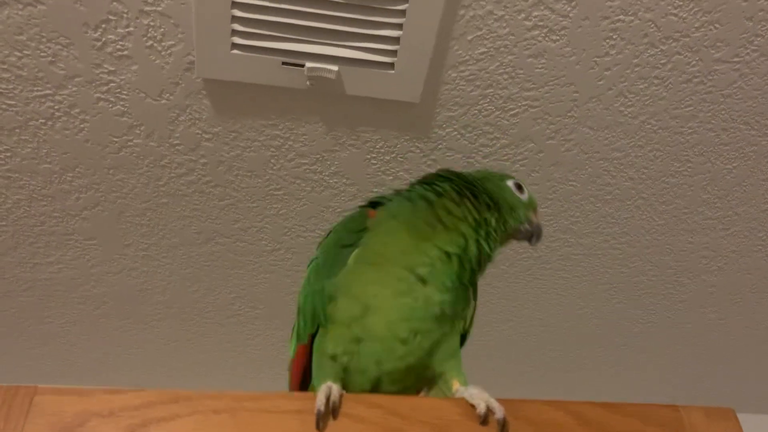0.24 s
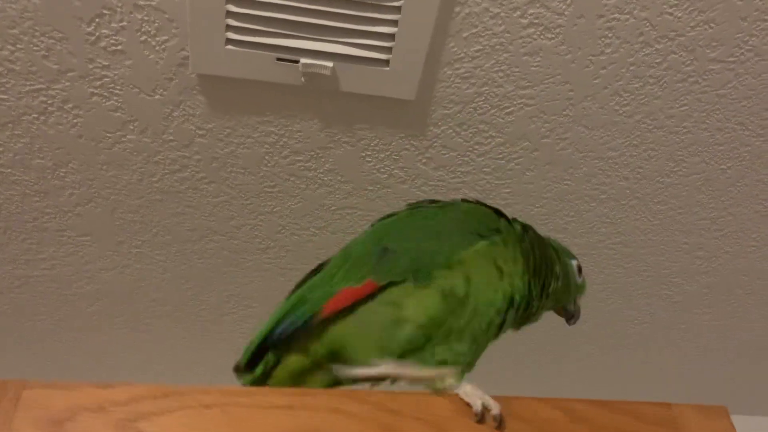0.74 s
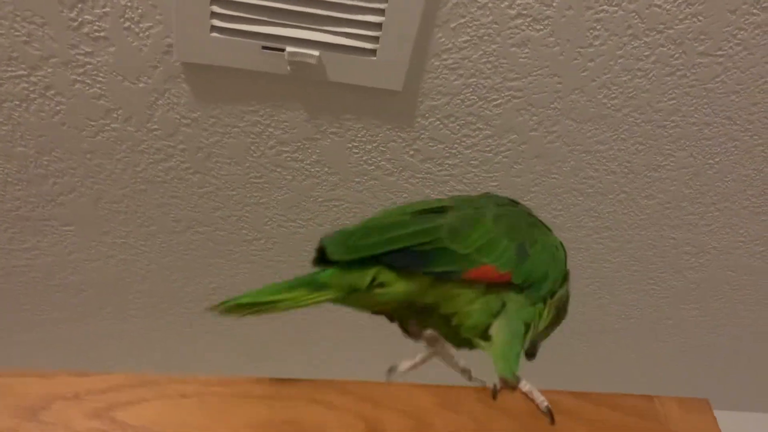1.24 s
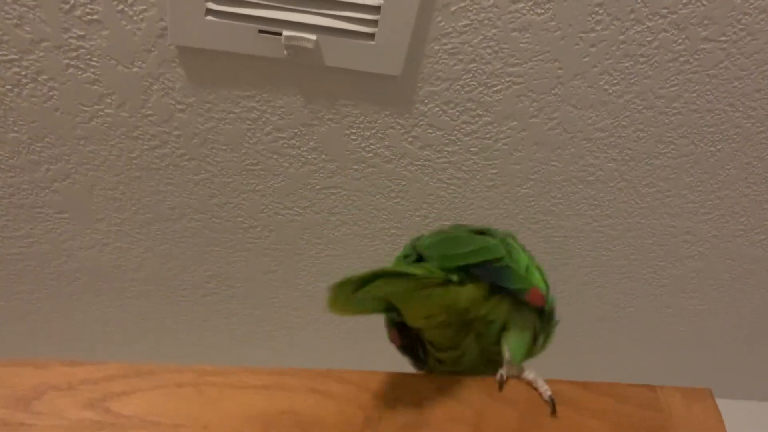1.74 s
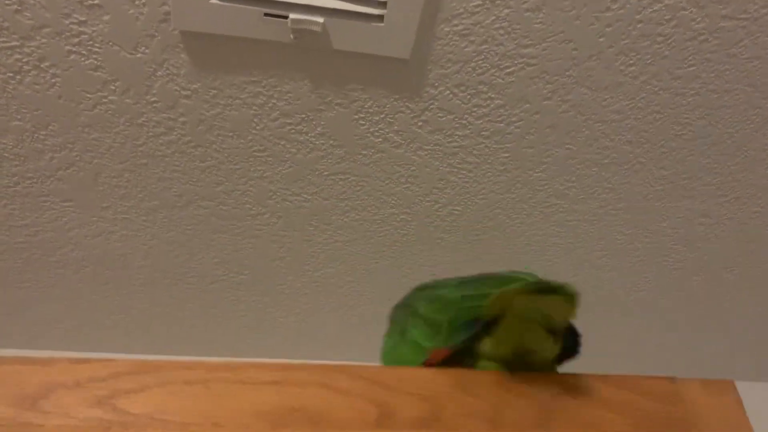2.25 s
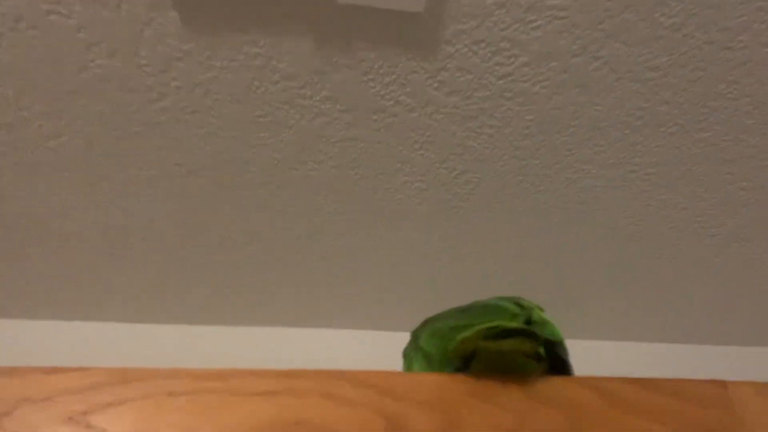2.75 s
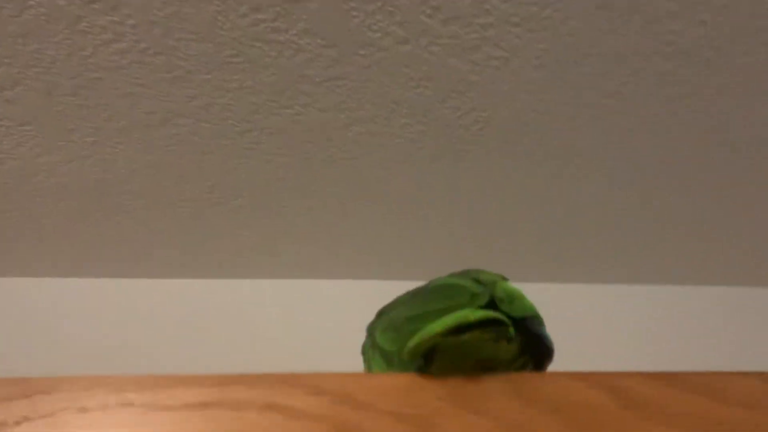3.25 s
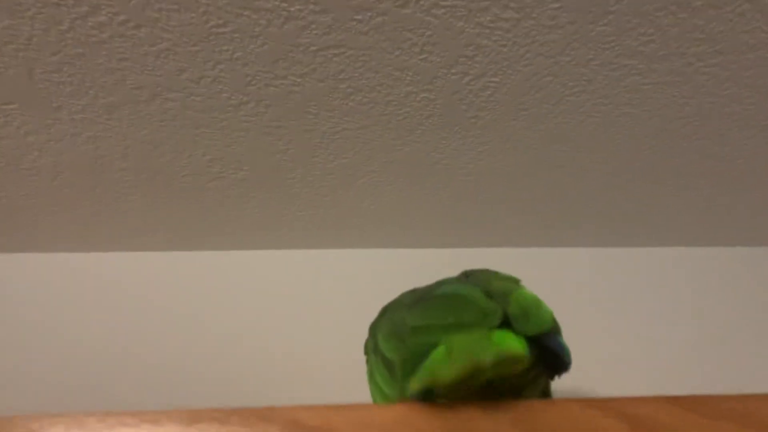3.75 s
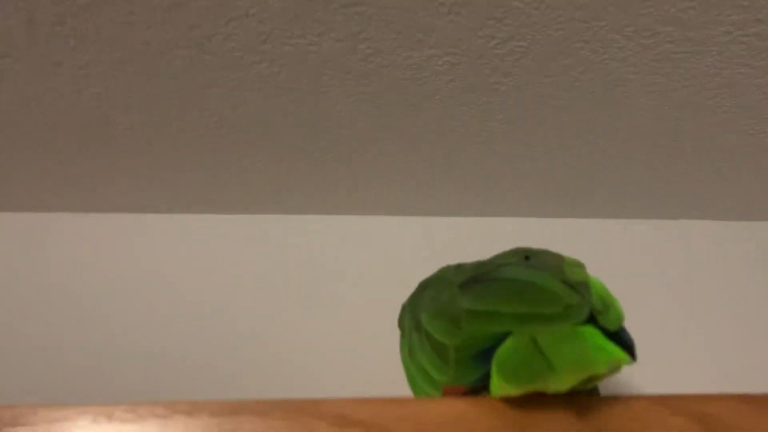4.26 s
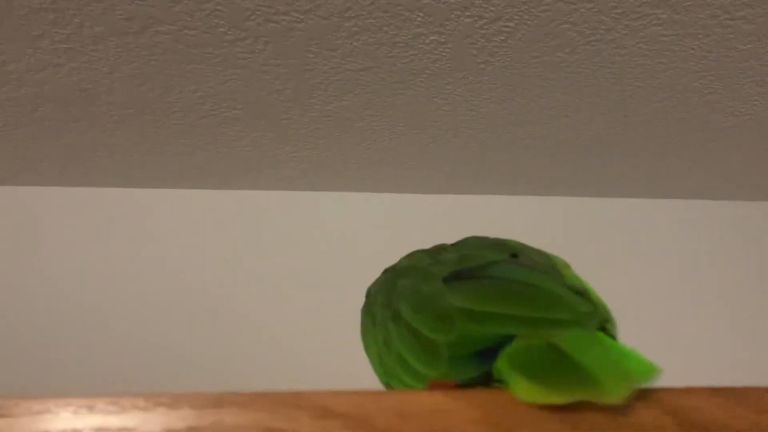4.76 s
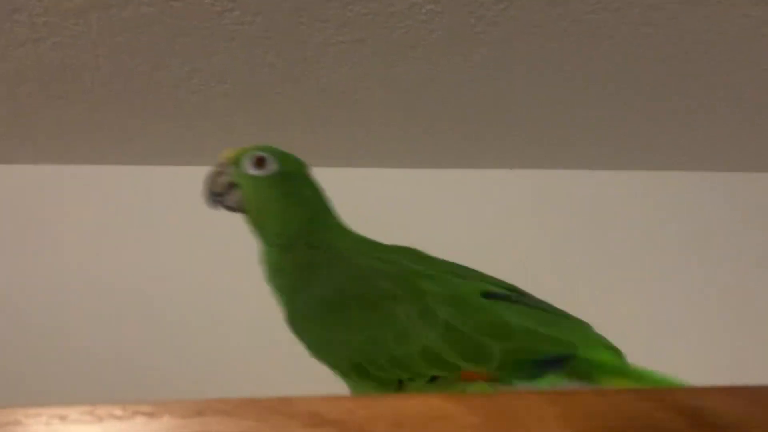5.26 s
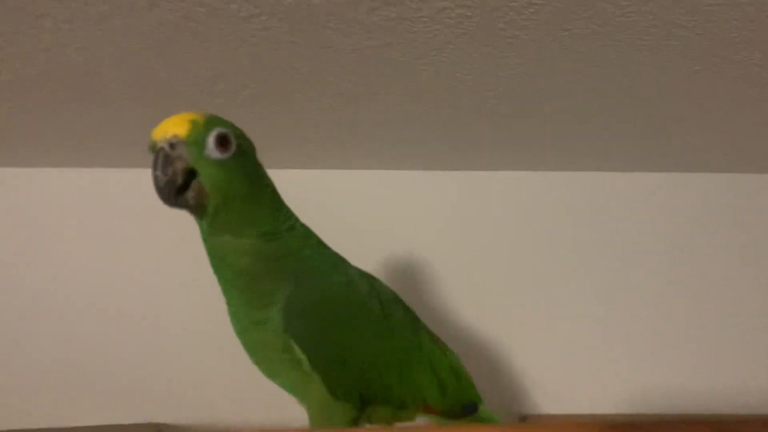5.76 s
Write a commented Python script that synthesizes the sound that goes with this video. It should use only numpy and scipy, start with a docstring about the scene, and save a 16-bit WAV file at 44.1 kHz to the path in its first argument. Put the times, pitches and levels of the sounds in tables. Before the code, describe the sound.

Over a steady low hum, a parrot shuffles on wood with light claw clicks, a dull thud and, finally, louder rustling.

```python
"""A steady mains hum fills a small room, where a parrot turns round on top of a wooden cabinet.
It bumps the hollow cabinet, whose modes answer with a low thud. Its claws tick, rasp and slide
on the ledge: stick-slip friction excites the wood's resonances, some with a tiny pitched ring.
Feathers brush the wood, with soft, dull shuffling. Near the end a close rustle sets in, with low
surges and the rumble of a hand conducted through the microphone's housing."""
import sys
import numpy as np
from scipy import signal
from scipy.fft import rfft, irfft, next_fast_len
from scipy.io import wavfile
from scipy.ndimage import uniform_filter1d

SR = 44100
rng = np.random.default_rng(int(sys.argv[2]) if len(sys.argv) > 2 else 0)


def output_pcm(signal):
    """Save a mono or channel-first signal as 16-bit PCM at the path in sys.argv[1].

    Samples are clipped to [-1, 1] before scaling.
    """
    pcm = np.clip(np.atleast_2d(signal).T, -1, 1) * 32767
    wavfile.write(sys.argv[1], SR, np.round(pcm).astype(np.int16))


N = 265658

# Levels are relative within each table; a spectrum gives the shape of a noise, per unit bandwidth.
MAINS_HZ = 59.98
# partials of the mains hum: harmonic_number, level_db
HUM_HARMONICS = [(1, -52.8), (2, -60.3), (3, -68.2), (5, -80.5), (6, -78.5), (10, -91)]
# slow swell of the hum: time_s, gain_db
HUM_GAIN = [(0, -1.5), (2.1, 1), (2.6, -1), (3.2, -0.2), (4.15, -1.5), (6.02, 1.5)]
# spectrum of the room's air: frequency_hz, level_db
AIR_SPECTRUM = [(12, -31), (25, -20), (38, 1), (60, 8), (100, 5.5), (200, -5.5), (370, -11.5), (600, -22),
                (1100, -26), (2500, -38.5), (5000, -41), (8000, -44), (12000, -44), (16000, -52)]
# bumps on the cabinet: start_s, thud_db, rap_db
CABINET_BUMPS = [(0.0585, -81, -72.5), (0.91, -65.5, -76), (1.041, -61, -99), (1.191, -64.5, -70),
                 (2.938, -54.5, -68), (3.266, -70, -79), (3.733, -46.5, -55), (3.774, -58, -70),
                 (4.054, -90.5, -75), (5.549, -56, -57.5), (5.926, -60.5, -71)]
# resonances of the door panel: frequency_hz, width_hz, gain_db
PANEL_MODES = [(465, 340, 2.5), (880, 240, 6.5), (1060, 270, 5), (1220, 145, 6), (1680, 140, -2),
               (2320, 270, -2.5), (3970, 740, -17)]
# modes of the hollow cabinet: frequency_hz, level_db, t60_s
CABINET_MODES = [(88.9, 7.5, 0.27), (135.5, 7.5, 0.23), (230.6, -0.5, 0.12), (279, -10.5, 0.12),
                 (316, -15.5, 0.16), (417.5, -11.5, 0.17), (617, -25.5, 0.35)]
# pitched ticks of beak or claw: centre_s, pitch_hz, level_db
PITCHED_TICKS = [(.062, 5700, -75.5), (0.318, 2396, -60.5), (.412, 1520, -74.5), (0.521, 3520, -75),
                 (0.593, 2380, -79), (.708, 2280, -72), (.988, 3710, -64), (1.005, 1180, -66),
                 (1.275, 2330, -74), (1.345, 2760, -73), (1.434, 2180, -81), (1.515, 2780, -63.5),
                 (2.234, 3300, -56), (2.791, 1790, -73), (2.955, 3210, -72), (3.307, 2740, -70.5),
                 (3.535, 2690, -70), (3.795, 2460, -65.5), (3.972, 2370, -73.5), (4.511, 2560, -71),
                 (4.687, 1880, -52.5), (4.697, 1104, -56), (5.162, 1950, -59), (5.372, 2530, -53),
                 (5.646, 2550, -55.5), (5.829, 2780, -59)]
# chatter of a dragged claw: start_s, length_s, pitch_hz, width_hz, level_db
CLAW_RASPS = [(0.585, 0.043, 3600, 200, -76.5), (0.713, 0.28, 2580, 550, -76),
              (0.734, 0.32, 3570, 330, -74.5), (1.04, 0.1, 3600, 90, -76), (1.145, 0.11, 620, 60, -63),
              (1.192, 0.093, 3710, 90, -66.5), (1.495, 0.16, 2770, 140, -67.5),
              (1.505, 0.065, 4750, 200, -72), (4.683, 0.06, 1980, 150, -65), (4.695, 0.074, 5660, 90, -60),
              (4.983, 0.034, 2000, 300, -58), (5.574, 0.045, 6250, 350, -50.5),
              (5.698, 0.041, 1270, 250, -58.5)]
# strokes of feathers on wood: start_s, length_s, level_db
FEATHER_STROKES = [(.6, 0.78, -79.5), (1.14, 0.15, -89), (1.85, 0.12, -79)]
# spectrum of feather friction: frequency_hz, level_db
FEATHER_SPECTRUM = [(300, -5), (1500, -2), (2600, 3), (3100, -3.5), (3700, 1), (7000, -5), (10000, 1.5),
                    (15500, -2)]
# dull scuffs, soft shuffling early, then low surges of the close rustle: start_s, length_s, level_db
DULL_SCUFFS = [(.82, 0.52, -67.5), (1.6, 0.46, -77.5), (1.9, 0.2, -67.5), (2.37, 0.087, -69.5),
               (3.18, 0.21, -65.5), (4.74, 0.31, -59), (5.08, 0.33, -63), (5.6, 0.36, -60),
               (5.905, 0.064, -47.5), (5.98, 0.24, -51)]
# spectrum of the dull scuffs: frequency_hz, level_db
SCUFF_SPECTRUM = [(60, 5.5), (180, -2), (400, 0.5), (620, -4.5), (1200, -20), (3000, -77), (16000, -61)]
# claws striking the ledge: time_s, tip_snap_db, wood_ring_db, foot_push_db, bite_s
CLAW_CONTACTS = [(0.9886, -46, -62.5, -85, .0008), (1.158, -54, -62.5, -89, .0015),
                 (1.1788, -43, -61.5, -73, 0.0011), (1.2087, -37.5, -57, -71, 0.00093),
                 (1.2545, -49.5, -82, -68, .003), (1.511, -56, -54.5, -83, 0.0014),
                 (1.559, -67, -63, -64.5, .002), (1.601, -61, -60.5, -68, 0.0011),
                 (1.652, -81, -61.5, -60, 0.0031), (1.9649, -71, -90, -79, 0.0021),
                 (1.988, -50.5, -58.5, -75, 0.0045), (2.121, -61, -80, -97, 0.0027),
                 (2.2115, -42.5, -52, -82, 0.0037), (2.2312, -35, -48.5, -67, 0.0027),
                 (2.248, -42.5, -56, -73, 0.0018), (2.541, -51.5, -60, -67, 0.0017),
                 (2.7175, -62, -87, -99, 0.0064), (3.151, -88, -95, -62, 0.0016),
                 (3.181, -82, -93, -66, 0.0015), (3.215, -61, -85, -66, 0.0059),
                 (3.412, -59, -57.5, -93, 0.0016), (3.4279, -57, -53.5, -64.5, 0.0026),
                 (3.4923, -49.5, -89, -63.5, 0.0039), (3.577, -65.5, -66.5, -81, .002),
                 (3.829, -62.5, -62.5, -64, 0.0033), (3.905, -61.5, -78, -71, 0.0018),
                 (4.159, -66, -69.5, -87, 0.0048), (4.23, -66, -73, -63, 0.0024),
                 (4.3326, -63, -93, -88, 0.0022), (4.605, -69, -56.5, -102, 0.005),
                 (4.686, -71, -57, -55, 0.0049), (4.949, -39.5, -46, -61, .003),
                 (5.1755, -33, -39.5, -60, 0.0026), (5.1989, -32.5, -54, -71, 0.0038),
                 (5.314, -55, -49.5, -85, 0.0049), (5.367, -29, -40.5, -58, 0.003),
                 (5.5494, -28.5, -38, -46, 0.002), (5.637, -33, -47.5, -63, 0.0045),
                 (5.9195, -42.5, -50.5, -74, 0.0035), (5.9522, -35, -47.5, -70, 0.0042)]
# ledge resonances under a claw: frequency_hz, width_hz, gain_db
LEDGE_MODES = [(1595, 630, -9.5), (2440, 740, 0), (2710, 466, 1.5), (3350, 1180, -5), (4660, 760, -3.5),
               (6240, 1500, -15)]
# low ledge resonances under a foot's weight: frequency_hz, width_hz, gain_db
LEDGE_LOW_MODES = [(614, 160, 0), (900, 400, -4), (1240, 300, -2)]
# claws sliding over the grain: start_s, length_s, tip_db, wood_db
CLAW_SLIDES = [(1.14, 0.13, -72, -87), (1.937, 0.047, -60, -71), (2.12, 0.037, -67, -89),
               (2.198, 0.05, -56, -59.5), (2.403, 0.043, -48.5, -74.5), (2.514, 0.089, -56, -69.5),
               (3.489, 0.15, -61, -77), (4.615, 0.12, -58, -63), (5.392, 0.04, -58, -78),
               (5.623, 0.04, -60, -54)]
# close rustle as the rubbing presses and eases: time_s, body_db, hiss_db
RUSTLE_ENVELOPE = [(4.6, -83, -100), (4.65, -66, -78), (4.72, -56, -72), (4.87, -54.5, -68.5),
                   (5.0, -56.5, -58.5), (5.08, -54.5, -63), (5.2, -50.5, -59), (5.28, -53.5, -56),
                   (5.34, -61, -62), (5.4, -53.5, -51), (5.45, -60, -67), (5.5, -53, -63), (5.53, -59, -67),
                   (5.58, -54, -59), (5.71, -60.5, -57), (5.77, -60.5, -62.5), (5.83, -55, -59.5),
                   (5.88, -63, -65), (5.93, -55, -53.5), (6.02, -57, -62.5)]
# spectrum of the rustle's dull body: frequency_hz, level_db
RUSTLE_SPECTRUM = [(60, 18), (170, 20.5), (300, 8.5), (520, 12), (800, 7), (1250, 4.5), (2000, 3),
                   (2700, 4), (3400, -4), (6500, -6), (9000, -26), (16000, -18)]
# spectrum of the rustle's bright hiss: frequency_hz, level_db
HISS_SPECTRUM = [(1000, -36), (4000, -2.5), (7500, -12), (9200, -3), (11500, -4), (14300, 2.5), (16000, -4)]
# shifts of the hand on the microphone's housing: start_s, length_s, level_db
HAND_SHIFTS = [(4.76, 0.33, -46.5), (5.02, 0.37, -41.5), (5.33, 0.2, -43.5), (5.58, 0.24, -53),
               (5.785, 0.12, -39), (5.97, 0.18, -41)]
# spectrum of the handling rumble: frequency_hz, level_db
RUMBLE_SPECTRUM = [(12, -65), (25, -18), (42, 4), (70, 4), (100, -4), (160, -17.5), (300, -25.5),
                   (1000, -49.5)]
# reverberation time of the room: frequency_hz, t60_s
ROOM_DECAY = [(100, 0.26), (500, 0.25), (1500, 0.29), (3500, 0.25), (9000, 0.13), (16000, 0.008)]
# likeness of diffuse sound at the two microphone ports: frequency_hz, coherence_ratio
PORT_COHERENCE = [(60, 0.26), (150, 0.8), (300, 0.74), (600, 0.2), (2000, 0.018), (6000, 0.02),
                  (8000, 0.98), (16000, 0.54)]
# phase of the right port against the left: frequency_hz, phase_rad
PORT_PHASE_SHIFT = [(200, 0), (900, -.8), (1500, -.3), (2300, -.5), (3000, -2.3), (5000, -3), (6400, 0),
                    (8400, 3.1), (8900, 3.3), (10500, 6.2), (11400, 6.4), (13000, 9.3), (13800, 9.6),
                    (15300, 12.5), (16500, 12.6)]
# level of the left port against the right: frequency_hz, balance_db
PORT_LEVEL_BALANCE = [(500, 0.46), (1000, 1.7), (2000, -0.7), (4000, -1.5), (8000, 0)]


def from_db(db):
    """Amplitude grows tenfold for every 20 dB."""
    return 10 ** (np.asarray(db) / 20)


def rms_one(x):
    """Normalisation to unit mean power."""
    return x / np.sqrt(np.mean(x ** 2) + 1e-20)


def at_level(blow, db):
    """Equal energy: a blow is given the energy of 10 ms of steady sound at this level."""
    return from_db(db) * blow / np.sqrt(np.sum(blow ** 2) / (SR / 100))


def in_time(rows):
    """Linear interpolation of each column of a curve at every sample."""
    times_s, *columns = np.transpose(rows)
    return [np.interp(np.arange(N) / SR, times_s, column) for column in columns]


def at_hz(points, hz):
    """Interpolation of a table along log frequency."""
    knots_hz, values = np.transpose(points)
    return np.interp(np.log(np.maximum(hz, 1)), np.log(knots_hz), values)


def add(track, start_s, sound):
    """Superposition: a sound adds to the track from its start time."""
    i = max(int(start_s * SR), 0)
    track[i:i + len(sound)] += sound[:N - i]


def drift(knots_per_s):
    """Random modulation of unit variance: straight lines join Gaussian values."""
    knots = rng.standard_normal(2000)
    return np.interp(np.arange(N) / SR * knots_per_s, np.arange(len(knots)), knots) / np.sqrt(2 / 3)


def strokes(rows, peak_share):
    """Amplitude envelope: each stroke peaks after a share of its length and dies away."""
    t, gain = np.arange(N) / SR, 0
    for start_s, length_s, db in rows:
        ramp = np.interp((t - start_s) / length_s, [0, peak_share, 1], [0, 1, 0])
        gain = gain + from_db(db) * np.sin(np.pi / 2 * ramp)
    return gain


def diffuse(spectrum):
    """A diffuse field is only partly coherent at two points: shaped stereo noise of rms 1."""
    size = next_fast_len(N)
    hz = np.fft.rfftfreq(size, 1 / SR)
    mid, side = rfft(rng.standard_normal((2, size)))
    coherence = at_hz(PORT_COHERENCE, hz)
    pair = np.sqrt(1 + coherence) * mid + np.sqrt(1 - coherence) * side * [[1], [-1]]
    return rms_one(irfft(pair * from_db(at_hz(spectrum, hz)))[:, :N])


def resonate(force, modes):
    """Modal superposition: damped resonators add with alternating signs and slightly random weights."""
    out = 0
    for k, (hz, width_hz, db) in enumerate(modes):
        radius = np.exp(-np.pi * width_hz / SR)
        feedback = [1, -2 * radius * np.cos(2 * np.pi * hz / SR), radius ** 2]
        band = signal.lfilter([1, 0, -1], feedback, force)
        weight = from_db(db + rng.normal(0, 1.5))
        out = out + (-1) ** k * (1 - radius ** 2) / 2 * weight * band
    return out


def contact(bite_s, drag_db=-22.5, drag_s=0.0071):
    """Contact friction: a hard tip bites in a burst of micro-slips, then drags faintly on the grain."""
    t = np.arange(SR // 10) / SR
    age = t / bite_s
    attack = (1 - np.exp(-1.8 * age)) ** 2
    grip = np.exp(-1.5 * age) + from_db(drag_db) * np.exp(-t / drag_s)
    slips = rng.standard_normal(len(t)) * from_db(rng.normal(0, 3.5, len(t)))
    return slips * attack * grip


def rubbing(spectrum, grain_db, grains_per_s, surge_db):
    """Friction noise: countless tiny slips merge into a hiss with grains and small surges; rms 1."""
    return rms_one(diffuse(spectrum) * from_db(grain_db * drift(grains_per_s) + surge_db * drift(25)))


def room_response(build_s):
    """Reverberation: dense reflections build up and decay exponentially, the treble first."""
    t, tail = np.arange(SR // 2) / SR, 0
    white = diffuse([(20, 0), (20000, 0)])[:, :len(t)]
    spectrum, hz = rfft(white), np.fft.rfftfreq(len(t), 1 / SR)
    centres_hz = np.geomspace(100, 16000, 10)
    for centre_hz, share in zip(centres_hz, np.eye(len(centres_hz))):
        band = irfft(spectrum * np.interp(hz, centres_hz, share), len(t))
        tail = tail + band * from_db(-60 * t / at_hz(ROOM_DECAY, centre_hz))
    tail = tail * (1 - np.exp(-t / build_s))
    return tail / np.sqrt(np.sum(tail ** 2) / 2)


def in_room(direct, walls, wet_db):
    """Convolution with the room's response adds reflections to the direct sound."""
    return direct + from_db(wet_db) * signal.oaconvolve(direct[None], walls)[:, :N]


def mains_hum(waver_db, wavers_per_s):
    """Harmonic series: an appliance buzzes once per mains cycle; higher partials waver more."""
    phase = 2 * np.pi * MAINS_HZ * np.arange(N) / SR
    buzz = 0
    for k, db in HUM_HARMONICS:
        amplitude = np.sqrt(2) * from_db(db + .55 * k ** .9 * drift(4))
        buzz = buzz + amplitude * np.cos(k * phase + .09 * k * drift(5))
    return buzz * from_db(in_time(HUM_GAIN)[0] - waver_db * drift(wavers_per_s))


def room_air(level_db):
    """Ambient noise forms a steady diffuse field, strongest in the bass."""
    return from_db(level_db) * diffuse(AIR_SPECTRUM)


def cabinet_bumps(walls, swell_cycles, lag_s, boom_db, boom_swell_s, boom_t60_s):
    """Impact excitation: the panel raps, then cabinet modes swell, the lowest last, in a dense boom."""
    raps, thuds = np.zeros((2, N))
    t = np.arange(SR // 2) / SR
    low_band = signal.butter(2, [110, 288], "band", fs=SR, output="sos")
    boom_envelope = from_db(boom_db - 60 * t / boom_t60_s) * (1 - np.exp(-t / boom_swell_s))
    for start_s, thud_db, rap_db in CABINET_BUMPS:
        add(raps, start_s, at_level(resonate(contact(bite_s=0.0013), PANEL_MODES), rap_db))
        body = 0
        for hz, db, t60_s in CABINET_MODES:
            envelope = from_db(db - 60 * t / t60_s) * (1 - np.exp(-t * hz / swell_cycles))
            body = body + envelope * np.sin(2 * np.pi * (hz * t + rng.random()))
        boom = boom_envelope * rms_one(signal.sosfilt(low_band, rng.standard_normal(len(t))))
        add(thuds, start_s + lag_s, from_db(thud_db + 8.5) * (body + boom))
    return in_room(raps, walls, wet_db=2) + in_room(thuds, walls, wet_db=-9)


def pitched_ticks(walls, gain_db, width_hz, length_s):
    """Narrow-band resonance: a quick swell of tiny slips rings roughly round one pitch."""
    ticks, t = np.zeros(N), np.arange(SR // 10) / SR
    swell = np.sin(np.pi * np.minimum(t / length_s, 1)) ** 2
    for centre_s, pitch_hz, db in PITCHED_TICKS:
        slips = swell * rng.standard_normal(len(t))
        ring = resonate(slips, [(pitch_hz, width_hz, 0)])
        ring = resonate(ring, [(pitch_hz, 260, 0)])  # a wider band steepens the skirts
        add(ticks, centre_s - length_s / 2, at_level(ring, db + gain_db))
    return in_room(ticks, walls, wet_db=-4.5)


def claw_rasps(walls, slips_per_s, gain_db):
    """Stick-slip motion: a dragged claw rings one resonance, narrow in a squeak, broad in a scratch."""
    rasps = 0
    for start_s, length_s, pitch_hz, width_hz, db in CLAW_RASPS:
        slips = (rng.random(N) < slips_per_s / SR) * rng.uniform(-1.94, 1, N)
        ring = resonate(slips + 1e-18, [(pitch_hz, width_hz, 0)])
        ring = resonate(ring, [(pitch_hz, pitch_hz / 2, 0)])
        rasps = rasps + rms_one(ring) * strokes([(start_s, length_s, db + gain_db)], peak_share=0.23)
    return in_room(rasps, walls, wet_db=-3.5)


def feathers(stir_db):
    """Light friction: feathers hiss as they brush the wood and stir faintly between strokes."""
    envelope = from_db(stir_db) + strokes(FEATHER_STROKES, peak_share=0.52)
    return envelope * rubbing(FEATHER_SPECTRUM, grain_db=1.3, grains_per_s=250, surge_db=.8)


def dull_scuffs():
    """Low-frequency friction noise: soft shuffling early, then low surges of the close rustle."""
    envelope = strokes(DULL_SCUFFS, peak_share=0.33)
    return envelope * rubbing(SCUFF_SPECTRUM, grain_db=1.8, grains_per_s=80, surge_db=1.5)


def claw_clicks(walls, snap_gain_db, crack_gain_db, wood_gain_db, drag_ratio):
    """A brief force has a broad spectrum: the tip snaps, with a dry crack and a ring of the ledge."""
    tips, wood = np.zeros((2, N))
    snap_band = np.vstack([signal.butter(3, 8930, "high", fs=SR, output="sos"),
                           signal.butter(2, 14500, fs=SR, output="sos")])
    crack_band = signal.butter(2, [1000, 7500], "band", fs=SR, output="sos")
    for time_s, snap_db, ring_db, push_db, bite_s in CLAW_CONTACTS:
        start_s = time_s - bite_s / 2
        skid = contact(bite_s, drag_db=-23, drag_s=drag_ratio * bite_s)  # a slow bite drags longer
        snap = signal.sosfilt(snap_band, skid) + .17 * signal.sosfilt(crack_band, skid)
        crack = signal.sosfilt(crack_band, contact(bite_s, drag_db=-25.5))
        add(tips, start_s, at_level(snap, snap_db + snap_gain_db))
        add(tips, start_s, at_level(crack, ring_db + crack_gain_db))
        add(wood, start_s, at_level(resonate(skid, LEDGE_MODES), ring_db + wood_gain_db))
        add(wood, start_s, at_level(resonate(skid, LEDGE_LOW_MODES), push_db + wood_gain_db))
    return in_room(tips, walls, wet_db=-7) + in_room(wood, walls, wet_db=0.5)


def claw_slides(walls, tip_gain_db, wood_gain_db):
    """Surface roughness: a claw crossing the grain hisses and drives the ledge as it presses and eases."""
    slides, t = np.zeros(N), np.arange(SR // 4) / SR
    treble = signal.butter(2, 9500, "high", fs=SR, output="sos")
    for start_s, length_s, tip_db, wood_db in CLAW_SLIDES:
        pressure = np.sin(np.pi * np.minimum(t / length_s, 1) ** .7) ** 2
        friction = pressure * rng.standard_normal(len(t)) * from_db(rng.normal(0, 4, len(t)))
        add(slides, start_s, at_level(signal.sosfilt(treble, friction), tip_db + tip_gain_db))
        add(slides, start_s, at_level(resonate(friction, LEDGE_MODES), wood_db + wood_gain_db))
    return in_room(slides, walls, wet_db=7)


def close_rustle(walls, catches_per_s, crackle_db, snap_db):
    """Friction under uneven pressure: a dull body, a hiss and crackles as fibres catch and let go."""
    body_gain, hiss_gain = from_db(in_time(RUSTLE_ENVELOPE))
    treble = signal.butter(2, 9500, "high", fs=SR, output="sos")
    catches = (rng.random(N) < catches_per_s / SR) * rng.standard_normal(N)
    ring = resonate(catches, LEDGE_MODES + LEDGE_LOW_MODES)
    crackle = from_db(crackle_db) * rms_one(in_room(ring, walls, wet_db=-4))
    snaps = from_db(snap_db) * rms_one(signal.sosfilt(treble, catches + 1e-18))
    body = rubbing(RUSTLE_SPECTRUM, grain_db=2.8, grains_per_s=160, surge_db=1.7)
    hiss = rubbing(HISS_SPECTRUM, grain_db=2.2, grains_per_s=250, surge_db=2)
    return body_gain * (body + crackle) + hiss_gain * (hiss + snaps)


def handling_rumble():
    """Structure-borne sound: the housing carries a hand's low rumble to both microphone ports alike."""
    rumble = diffuse(RUMBLE_SPECTRUM).mean(axis=0)
    running_rms = np.sqrt(uniform_filter1d(rumble ** 2, size=3000))
    return strokes(HAND_SHIFTS, peak_share=0.38) * rumble / running_rms


def scene():
    """Linear superposition: the room's hum, the bird on its ledge and the close rustle add up."""
    walls = room_response(build_s=0.0012)
    room_tone = mains_hum(waver_db=0.26, wavers_per_s=2) + room_air(level_db=-62)
    brushing = feathers(stir_db=-81.5)
    scuffs = dull_scuffs()
    close = close_rustle(walls, catches_per_s=240, crackle_db=-11, snap_db=-18) + handling_rumble()
    bumps = cabinet_bumps(walls, swell_cycles=4.25, lag_s=0.00433,
                          boom_db=-7, boom_swell_s=0.01, boom_t60_s=0.33)
    slides = claw_slides(walls, tip_gain_db=-13.5, wood_gain_db=-9)
    clicks = claw_clicks(walls, snap_gain_db=-11.5, crack_gain_db=-16, wood_gain_db=-10, drag_ratio=4.2)
    ticks = pitched_ticks(walls, gain_db=-1.5, width_hz=130, length_s=0.019)
    rasps = claw_rasps(walls, slips_per_s=700, gain_db=-5.5)
    return room_tone + bumps + ticks + rasps + brushing + scuffs + clicks + slides + close


def record(dry):
    """Frequency response: each port has its own level and phase, and a steep low-pass cuts the top."""
    size = next_fast_len(N + 4096)
    hz = np.fft.rfftfreq(size, 1 / SR)
    phase_rad = np.interp(hz, *np.transpose(PORT_PHASE_SHIFT)) * np.array([[0], [1]])
    balance = from_db(at_hz(PORT_LEVEL_BALANCE, hz) * np.array([[.5], [-.5]]))
    ports = irfft(rfft(dry, size) * balance * np.exp(1j * phase_rad), size)[:, :N]
    low_pass = signal.ellip(10, .2, 70, 15950, fs=SR, output="sos")
    return signal.sosfilt(low_pass, ports)


dry = scene()
out = record(dry)
output_pcm(out)
```